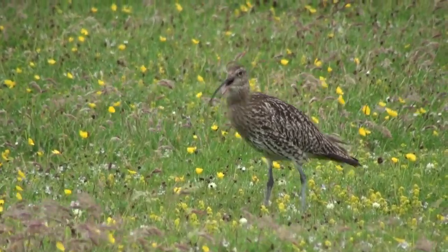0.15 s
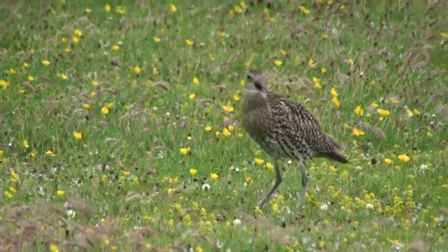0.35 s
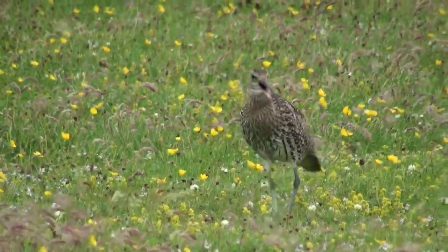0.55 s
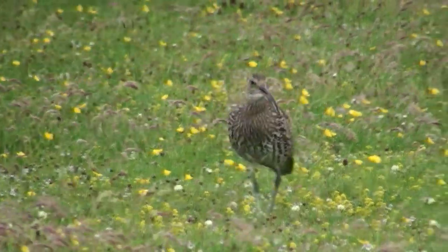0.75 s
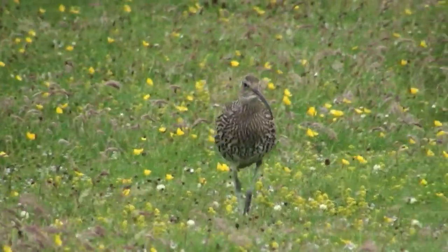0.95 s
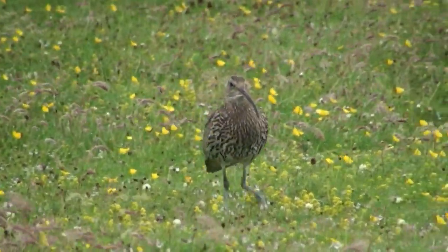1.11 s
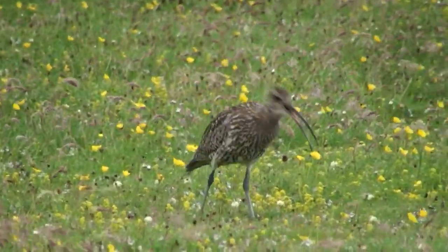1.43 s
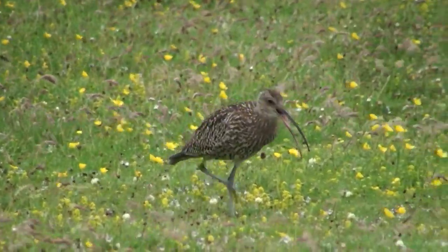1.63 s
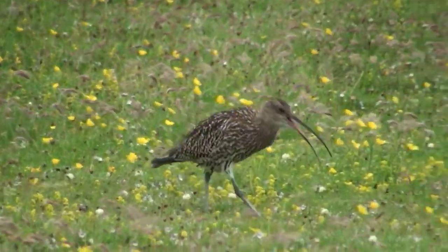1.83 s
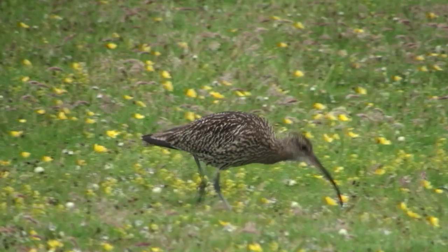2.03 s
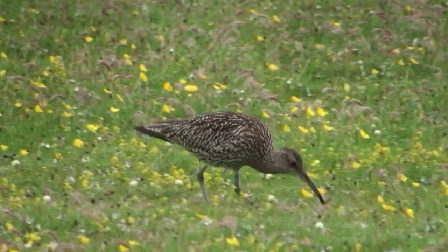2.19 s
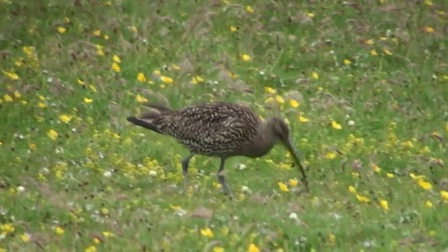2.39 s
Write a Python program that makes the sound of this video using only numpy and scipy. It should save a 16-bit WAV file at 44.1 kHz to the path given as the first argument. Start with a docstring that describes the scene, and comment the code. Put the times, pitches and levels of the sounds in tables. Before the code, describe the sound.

A wading bird calls loudly in an open meadow, slightly to the left, from about 0.2 to 0.85 seconds and again from 1.5 to 2.05. Each call jumps through a hoarse start, a whistle, a longer low note, a rising whistle and a high final whistle. Soft wind gusts buffet the microphone, mostly around 0.5 and 1 second, over a quiet outdoor hiss lasting until about 2.5 seconds.

```python
"""A wading bird calls twice in an open meadow, a little left of a stereo microphone. Each call jumps
through five notes: a hoarse low start, a whistle, a long low note, a rising whistle and a high whistle.
The voice is a stack of harmonics, coloured by the windpipe and shaken when hoarse. The meadow returns
a faint echo; gusts buffet the microphone over a quiet outdoor hiss, and a small bird chirps once far off."""
import sys
import numpy as np
from scipy import signal
from scipy.fft import rfft, irfft
from scipy.io import wavfile

SR = 44100
rng = np.random.default_rng(int(sys.argv[2]) if len(sys.argv) > 2 else 0)


def transcribe(signal):
    """Save signal, clipped to [-1, 1], as a 16-bit WAV file at the path in sys.argv[1]."""
    frames = np.atleast_2d(signal).T
    limited = np.clip(frames, -1, 1)
    pcm = np.round(limited * 32767).astype(np.int16)
    wavfile.write(sys.argv[1], SR, pcm)


N = 112454
CUTOFF_HZ = 15700


def amp(db):
    return 10 ** (np.asarray(db) / 20)


def unit_rms(x):
    return x / np.sqrt(np.mean(x ** 2) + 1e-20)


def at_hz(points, hz):
    """Read a table on a log-frequency axis."""
    table_hz, values = np.transpose(points)
    return np.interp(np.log(hz), np.log(table_hz), values)


def shaped(x, points):
    """Colour a signal by a (frequency [Hz], gain [dB]) table, falling steeply below its first point."""
    size = x.shape[-1]
    hz = np.maximum(np.arange(size // 2 + 1) * SR / size, 1)
    return irfft(rfft(x) * amp(at_hz(points, hz)) * np.minimum(hz / points[0][0], 1) ** 2, size)


def highpass(x, hz, order=1):
    return signal.sosfilt(signal.butter(order, hz, "high", fs=SR, output="sos"), x)


def drift(rate_hz, size):
    """Smooth random wander with an RMS of 1."""
    pole = np.exp(-2 * np.pi * rate_hz / SR)
    noise = rng.standard_normal(size + 8000)
    return unit_rms(signal.lfilter([1], [1, -2 * pole, pole * pole], noise)[8000:])


def countryside_hiss(level_db=-54.5):
    """Far noise of open country, swelling slowly and partly alike on both sides."""
    # Colour of the hiss: (frequency [Hz], spectral level [dB])
    colour = [(24, -54), (40, -12.5), (333, -12), (387, -8), (670, -10.5), (926, -14), (1080, -13.5),
              (2770, -23.5), (3390, -29), (15500, -44.5)]
    # Likeness of left and right: (frequency [Hz], correlation [0..1])
    likeness = [(60, 0.23), (130, 0.23), (290, 0.58), (640, 0.55), (1410, 0.63), (3100, 0.4), (6820, 0.067),
                (15000, 0.28)]
    # Slow swell: (time [s], gain [dB])
    swell = [(0, -11), (.2, -7), (0.899, -1.3), (1.399, -5), (2.55, -3)]
    mid, side = rfft(shaped(rng.standard_normal((2, N)), colour))
    alike = np.clip(at_hz(likeness, np.arange(len(mid)) * SR / N + 1), 0, 1)
    mid, side = mid * np.sqrt(1 + alike), side * np.sqrt(1 - alike)
    swell_db = np.interp(np.arange(N) / SR, *np.transpose(swell))
    return amp(level_db + swell_db) * unit_rms(irfft(np.array([mid + side, mid - side]), N))


def far_bird(start_s=2.356, length_s=.04, from_hz=4750, to_hz=5200, level_db=-72):
    """One thin rising chirp from a small bird far off."""
    progress = np.clip((np.arange(N) / SR - start_s) / length_s, 0, 1)
    hz = from_hz + (to_hz - from_hz) * progress
    return amp(level_db) * np.sin(np.pi * progress) * np.sin(2 * np.pi * np.cumsum(hz) / SR)


def wind_on_microphone(lump_db=2.5, lump_hz=24.7, brightening=.39, neutral_db=-39.5):
    """Lumpy low noise at each microphone port; strong gusts reach higher and thump."""
    # Gusts: (time [s], level [dB], left minus right [dB])
    gusts = [(0, -71.5, 0.5), (.22, -73, -4), (0.329, -37.5, -5), (.38, -39.5, 4.5), (.46, -32, 1.5),
             (.53, -32.5, 5.5), (.62, -64, 0.5), (.82, -40.5, -4), (.97, -34.5, -5), (1.041, -46.5, 2.5),
             (1.15, -46, 0), (1.211, -36.5, -11.5), (1.259, -55.5, -0.5), (1.36, -54, 6), (1.451, -77, -4),
             (1.62, -46, 1), (1.689, -53.5, 7.5), (1.842, -73.5, -7.5), (1.95, -41, -2), (2.0, -53.5, -2.5),
             (2.05, -40.5, 4), (2.082, -38.5, -4), (2.149, -54.5, 2.5), (2.41, -66, -7.5),
             (2.501, -52.5, -8.5), (2.525, -38.5, -7.5), (2.55, -64, 2)]
    # Colour of the buffeting: (frequency [Hz], spectral level [dB])
    buffet = [(15, -52.5), (25, -17), (119, 0), (176, -1), (345, -10), (401, -13), (619, -26.5), (900, -31),
              (1170, -66), (1980, -120)]
    # Wind thumps on the microphone: (time [s], rough peak level [dB])
    hits = [(0.334, -37), (0.381, -25), (0.437, -25.5), (0.496, -23.5), (0.903, -27.5), (0.953, -27),
            (0.983, -26), (1.205, -32.5), (2.08, -33.5), (2.521, -33)]
    times, *columns = np.transpose(gusts)
    gust_db, pan_db = [np.interp(np.arange(N) / SR, times, c) for c in columns]
    mid, side = rng.standard_normal((2, N))
    side = highpass(side, hz=97.1)  # both ports share the deepest rumble
    lumps = drift(lump_hz, N) + .74 * np.array([drift(lump_hz, N), drift(lump_hz, N)])
    rumble = unit_rms(shaped(np.array([mid + side, mid - side]) * amp(lump_db * lumps), buffet))
    rumble += highpass(rumble, hz=300, order=2) * (amp(brightening * (gust_db - neutral_db)) - 1)
    hit_s, hit_db = np.transpose(hits)
    clicks = np.zeros(N)
    clicks[(hit_s * SR).astype(int)] = amp(hit_db) * rng.choice([-1, 1], len(hits))
    thumps = shaped(shaped(clicks, buffet), buffet)
    thumps *= np.abs(clicks).max() / np.abs(thumps).max()
    return amp(pan_db * np.array([[.5], [-.5]])) * (amp(gust_db) * rumble + thumps)


def meadow_echo(voice, level_db=-30, t60_s=.32, delay_s=.014, blur_hz=190):
    """Scattered returns from grass and distant ground, blurred by moving air and unlike on each side."""
    t = np.arange(SR // 2) / SR
    tail = rng.standard_normal((2, len(t))) * amp(-60 * t / t60_s) * (t > delay_s)
    tail /= np.linalg.norm(tail, axis=1, keepdims=True)
    blurred = voice[None] * drift(blur_hz, N)
    return amp(level_db) * signal.fftconvolve(blurred, tail, axes=1)[:, :N]


def rasp(main_db, hoarse_db):
    """Noise that only stands out when the voice is very hoarse."""
    # Colour of the rasp: (frequency [Hz], spectral level [dB])
    colour = [(1500, -14), (2500, 0), (4500, 0), (6300, -14), (7300, -40), (10500, -32), (13500, -62)]
    noise = unit_rms(shaped(rng.standard_normal(len(main_db)), colour))
    return amp(main_db + 2 * hoarse_db + 12) * noise / np.sqrt(2)


def subharmonics(t, hz, phase, fade_in_s=.005, fade_out_s=.016):
    """For a while the voice repeats only every 2nd or 3rd cycle, putting lines between the harmonics."""
    # Spells of split voice: (start [s], end [s], period [cycles], level [dB])
    splits = [(0.318, 0.554, 2, -59), (1.878, 1.92, 3, -41)]
    # Colour of the lines: (frequency [Hz], gain [dB])
    colour = [(1300, -14), (2000, -16.5), (2800, -9.5), (3400, -2), (4100, 2), (4800, -9.5), (5500, -21.5),
              (6800, -15), (7600, -62.5)]
    lines = np.zeros(len(t))
    for start, end, cycles, db in splits:
        gate = np.clip(np.minimum((t - start) / fade_in_s, (end - t) / fade_out_s), 0, 1)
        for ratio in [j / cycles for j in range(1, 7 * cycles) if j % cycles]:
            sine = np.sin(ratio * phase + rng.uniform(0, 2 * np.pi))
            lines += gate * amp(db + at_hz(colour, ratio * hz)) * sine
    return lines


def harmonics(hz, phase, group_db, hoarse_db, tone_db, treble_hz=7100, weak_db=-54):
    """Sines in three level groups; hoarseness makes them flutter, and weak overtones waver and fray."""
    # The windpipe colours a harmonic as it slides off its middle pitch: (frequency [Hz], gain [dB])
    windpipe = [(1150, -11.5), (1500, 7), (6600, -4), (7400, -19), (8400, -10), (12000, -3.5),
                (13000, -23.5)]
    numbers = np.arange(1, len(tone_db) + 1)
    middle_hz = np.median(hz)
    # 0: main tone (up to the strongest harmonic), 1: overtones below treble_hz, 2: those above
    groups = np.where(numbers <= 1 + np.argmax(tone_db), 0, np.where(numbers * middle_hz < treble_hz, 1, 2))
    tone = np.zeros(len(hz))
    for n, db, group in zip(numbers, tone_db, groups):
        share = amp(db) / np.linalg.norm(amp(tone_db[groups == group]))
        weakness = (group > 0) * np.clip(db / weak_db, 0, 1)
        waver_db = 7.5 * weakness * drift(rate_hz=21.3, size=len(hz))
        flutter = 1 + (1.2 * amp(hoarse_db) + .5 * weakness ** 3) * drift(rate_hz=250, size=len(hz))
        windpipe_db = at_hz(windpipe, n * hz) - at_hz(windpipe, n * middle_hz)
        sine = np.sin(n * phase + rng.uniform(0, 2 * np.pi)) * (n * hz < CUTOFF_HZ)
        tone += share * flutter * amp(group_db[group] + waver_db + windpipe_db) * sine
    return tone


def note(contour, tone_db, attack_s=.0022, release_s=.002, jitter_hz=300, jitter_rad=.7):
    """One gliding note of the voice; hoarseness shakes its phase and adds rasp."""
    times, *columns = np.transpose(contour)
    first = int((times[0] - attack_s) * SR)
    t = np.arange(first, int((times[-1] + release_s) * SR)) / SR
    hz, *group_db, hoarse_db = [np.interp(t, times, c) for c in columns]
    phase = 2 * np.pi * np.cumsum(hz) / SR + jitter_rad * amp(hoarse_db) * drift(jitter_hz, len(t))
    sound = rasp(group_db[0], hoarse_db)
    sound += harmonics(hz, phase, group_db, hoarse_db, np.array(tone_db))
    sound += subharmonics(t, hz, phase)
    edge = np.clip(np.minimum((t - t[0]) / attack_s, (t[-1] - t) / release_s) / 2, 0, 1)
    voice = np.zeros(N)
    voice[first:first + len(t)] = np.sqrt(2) * np.sin(np.pi / 2 * edge) ** 2 * sound
    return voice


def wading_bird():
    """Two calls, the voice jumping through five notes in each."""
    # Note contours, one per call: (time [s], pitch [Hz], main tone level [dB],
    # lower overtone level [dB], treble overtone level [dB], hoarseness [dB])
    start = [
        [(.208, 1015, -50.5, -85.5, -95, -44), (.212, 1060, -39.5, -58.5, -101, -35.5),
         (.218, 1171, -33.5, -37, -72.5, -28), (.225, 1210, -30.5, -38, -62, -21.5),
         (.234, 1256, -26, -43.5, -81, -9.5), (.24, 1270, -27.5, -38.5, -75, -22.5),
         (.245, 1526, -30.5, -32, -79, -7.5)],
        [(1.544, 1026, -63.5, -69, -84.5, -41), (1.552, 1116, -44, -48.5, -73.5, -31),
         (1.559, 1157, -36, -40, -58.5, -33), (1.564, 1230, -32.5, -33, -54, -12.5),
         (1.57, 1226, -27, -46, -71.5, -15), (1.576, 1451, -32, -26, -65.5, -6.5),
         (1.579, 1720, -33, -33.5, -92, -21)],
    ]
    whistle = [
        [(.244, 2075, -36, -48, -80, -25), (.248, 1909, -16, -47, -70, -31),
         (.274, 1852, -22.5, -44.5, -76, -28.5), (.29, 1848, -23.5, -45.5, -76, -36),
         (.326, 1813, -29, -45.5, -82, -25), (.334, 1804, -36, -48, -91, -26)],
        [(1.579, 2032, -25, -44, -67.5, -26), (1.584, 1945, -17.5, -37, -57, -36.5),
         (1.591, 1912, -18, -44, -54, -23), (1.61, 1877, -22, -41.5, -55, -37.5),
         (1.631, 1857, -26.5, -42, -65.5, -27.5), (1.679, 1839, -29, -51, -86.5, -33.5),
         (1.687, 1897, -34.5, -48.5, -91, -39)],
    ]
    low = [
        [(.333, 1196, -34, -57, -81.5, -39), (.338, 1132, -35, -48, -78, -26.5),
         (.427, 1132, -34.5, -53.5, -84.5, -29), (.501, 1144, -34, -47.5, -64, -26),
         (.525, 1187, -33, -52, -62, -29), (.541, 1234, -33.5, -52.5, -67, -29),
         (.557, 1364, -36.5, -40.5, -74, -39.5), (.566, 1385, -41.5, -52, -80, -32.5),
         (.573, 1469, -50.5, -62, -86.5, -32.5)],
        [(1.685, 1213, -33.5, -59.5, -84, -23), (1.691, 1169, -36.5, -46.5, -75, -26),
         (1.75, 1199, -36.5, -48.5, -83, -38), (1.807, 1218, -35, -45.5, -89.5, -43),
         (1.825, 1221, -32.5, -43, -77.5, -39), (1.865, 1304, -30.5, -41.5, -88.5, -38),
         (1.871, 1374, -31, -43.5, -89, -28.5), (1.878, 1603, -43, -51.5, -94, -19)],
    ]
    rising = [
        [(.576, 1946, -33, -54.5, -78, -40), (.582, 1863, -26, -42.5, -64, -27.5),
         (.618, 1898, -24, -43, -50.5, -61), (.682, 1978, -21, -40.5, -51.5, -61.5),
         (.712, 2050, -19, -43.5, -61, -53.5), (.721, 2100, -18.5, -40.5, -58.5, -41),
         (.727, 2185, -23.5, -55.5, -77.5, -23.5), (.734, 2200, -24.5, -43.5, -80, -23),
         (.742, 2024, -45, -71, -90, -25)],
        [(1.879, 2080, -37.5, -66.5, -79.5, -35.5), (1.884, 2020, -22.5, -52.5, -83.5, -41),
         (1.911, 2032, -19.5, -45, -54.5, -31), (1.922, 2051, -17, -38.5, -54, -36),
         (1.933, 2090, -19.5, -35.5, -54, -39.5), (1.938, 2207, -25.5, -64, -67, -14.5),
         (1.943, 2148, -27, -39.5, -74, -19.5), (1.949, 2150, -49, -67.5, -86, -24.5)],
    ]
    high = [
        [(.731, 2726, -43, -60, -65.5, -23), (.736, 2807, -21, -37, -40.5, -24),
         (.748, 2869, -21, -34.5, -44, -19), (.765, 2885, -20, -26, -38.5, -57),
         (.803, 2839, -20.5, -32.5, -33.5, -60.5), (.828, 2765, -24.5, -38.5, -37, -57),
         (.838, 2632, -30, -47.5, -51, -45.5), (.848, 2780, -51, -68.5, -64, -53.5)],
        [(1.941, 2734, -51, -48, -66.5, -24), (1.946, 2832, -23.5, -34, -33.5, -18.5),
         (1.957, 2891, -21.5, -29, -32, -52), (2.017, 2834, -22, -29.5, -33.5, -64),
         (2.031, 2782, -27.5, -34.5, -42.5, -57.5), (2.038, 2662, -34.5, -49, -58, -49.5),
         (2.046, 2640, -63, -73, -77, -43)],
    ]
    # Balance of harmonics within their groups, one list per call: (1st [dB], 2nd [dB], ...)
    start_tones = [
        [-14.5, 0, -1, -8, -22.5, -31, -67, -59, -37, -62],
        [-14.5, 0.0053, -8.5, -4.5, -8, -40, -42, -26, -42.5, -31],
    ]
    whistle_tones = [
        [0, -22, -37, -57.5, -54, -57],
        [0, -19, -26.5, -53.5, -45.5, -43.5],
    ]
    low_tones = [
        [-20.5, 4, -16, -21, -30, -49.5, -64.5, -41, -43.5, -54.5],
        [-16, 1, -10, -20.5, -35.5, -52.5, -57.5, -58],
    ]
    rising_tones = [
        [0, -20, -21, -42.5, -30.5, -34.5, -63.5, -63],
        [0, -39, -32.5, -49.5, -47.5, -51.5],
    ]
    high_tones = [
        [0, -13.5, -17, -22, -48.5],
        [0, -8, -7.5, -18, -52.5],
    ]
    notes = [(start, start_tones), (whistle, whistle_tones), (low, low_tones),
             (rising, rising_tones), (high, high_tones)]
    return sum(note(contours[call], tones[call]) for contours, tones in notes for call in range(2))


def scene():
    """The wader a little to the left, the meadow around it and wind right on the microphone."""
    # The wader's place between the channels: (frequency [Hz], left minus right [dB])
    pan = [(1200, 1.5), (2000, 2), (2900, 1.5), (4000, 2.5), (5700, 0.43), (8500, 3.5), (11500, 1.1)]
    voice = wading_bird()
    direct = np.array([shaped(voice, [(hz, side * db / 2) for hz, db in pan]) for side in (1, -1)])
    return direct + meadow_echo(voice) + wind_on_microphone() + countryside_hiss() + far_bird()


def record(dry):
    """The microphone thins the deepest bass; the top is cut."""
    thinned = highpass(dry, hz=69)
    return signal.sosfilt(signal.ellip(10, .5, 70, CUTOFF_HZ, fs=SR, output="sos"), thinned)


dry = scene()
out = record(dry)
transcribe(out)
```